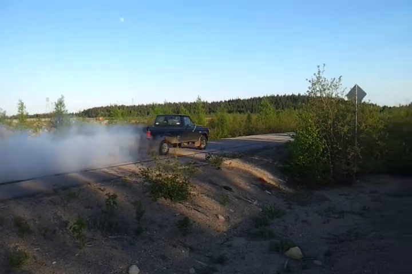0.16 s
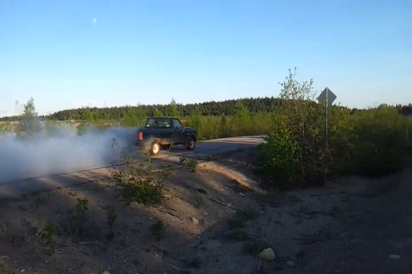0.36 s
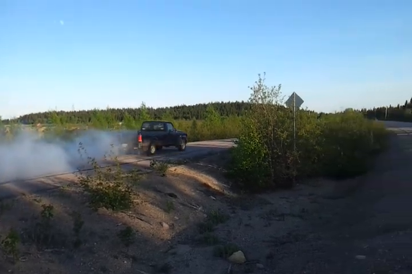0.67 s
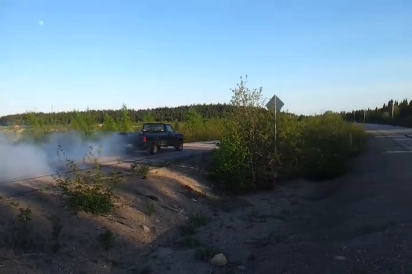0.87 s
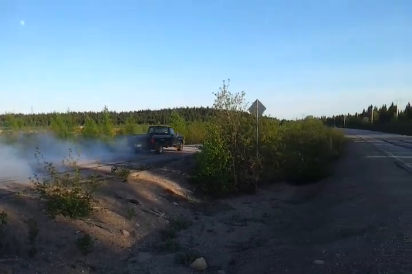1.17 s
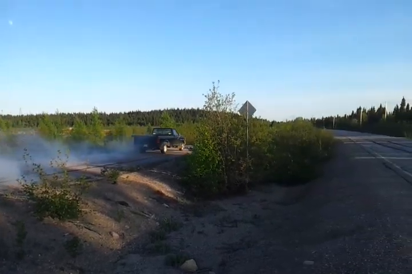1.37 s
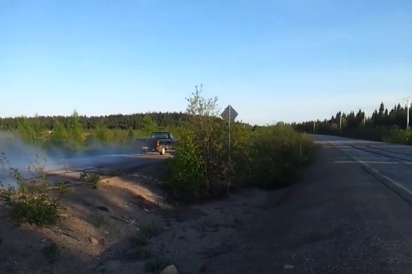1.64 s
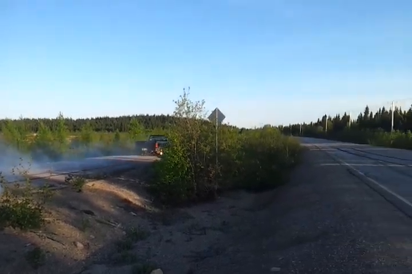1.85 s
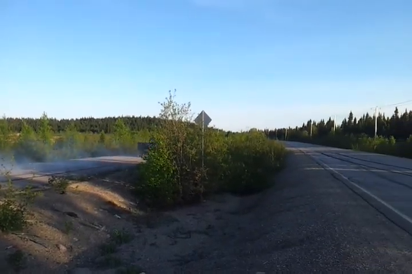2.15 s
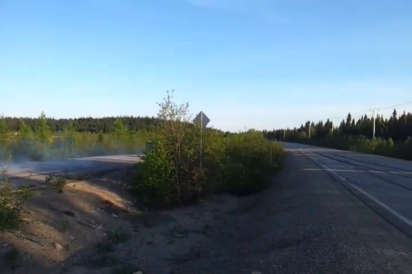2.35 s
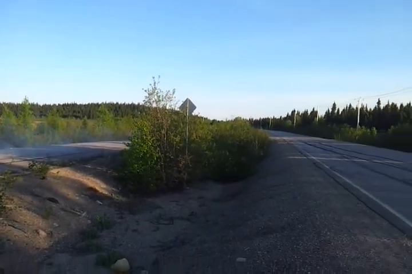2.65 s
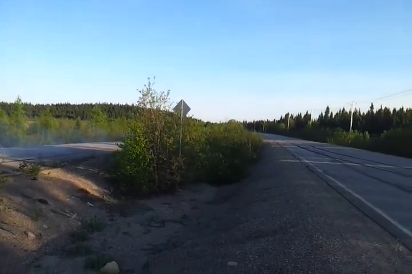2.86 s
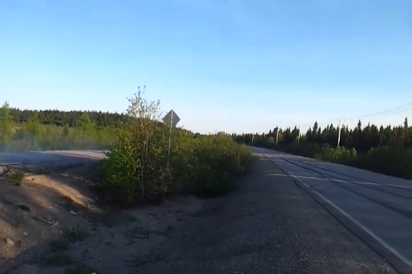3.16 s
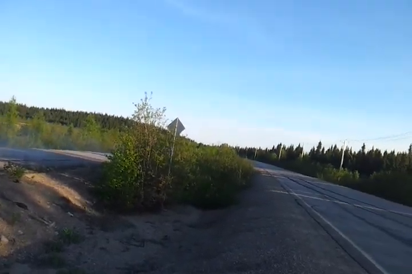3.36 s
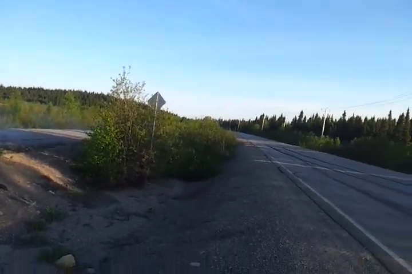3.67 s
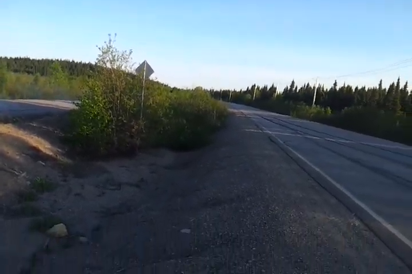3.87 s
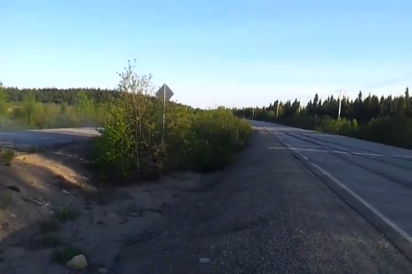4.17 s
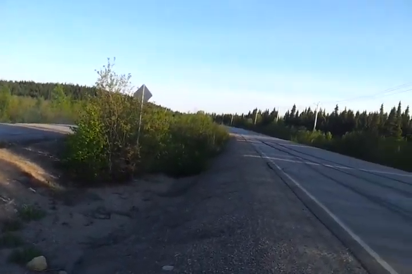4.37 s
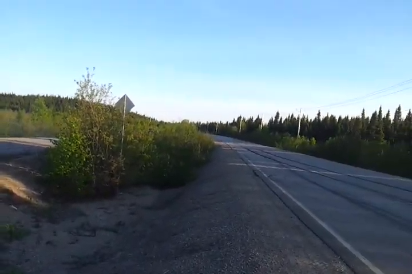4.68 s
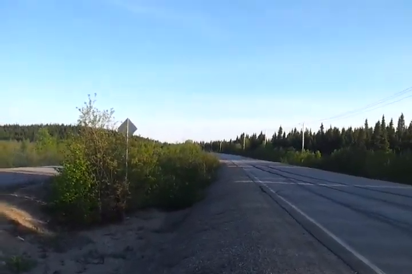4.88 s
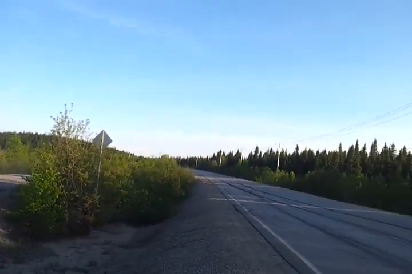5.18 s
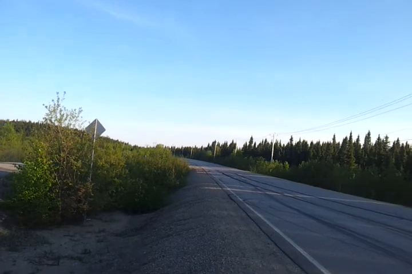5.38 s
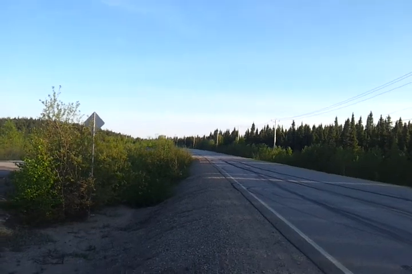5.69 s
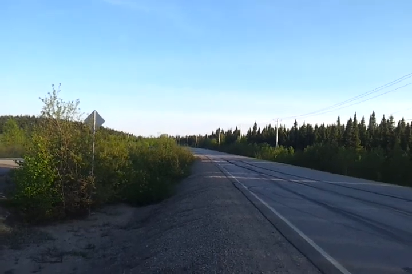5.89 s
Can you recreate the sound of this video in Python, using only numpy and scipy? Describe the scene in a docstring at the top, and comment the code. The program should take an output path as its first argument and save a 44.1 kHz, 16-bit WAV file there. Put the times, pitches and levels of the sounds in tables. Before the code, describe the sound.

Loud tyre scrub and throbbing exhaust drone of a truck burnout, dropping in pitch and receding, leaving faint bird chirps and gravel footsteps.

```python
"""A six-cylinder pickup does a burnout on a country road, then drives off behind bushes.
Its exhaust is low tones through a muffler plus raspy pulses ringing in a tailpipe; one cylinder runs weak.
Spinning tyres hiss as filtered noise that throbs with the engine, and tyre noise rushes up again at the end.
Nearby, bursts of noise and short thuds make feet shifting on the gravel shoulder; a far bird chirps."""
import sys
import numpy as np
from scipy import signal
from scipy.fft import rfft, irfft, next_fast_len
from scipy.io import wavfile
from scipy.ndimage import uniform_filter1d

SR = 44100
rng = np.random.default_rng(int(sys.argv[2]) if len(sys.argv) > 2 else 0)


def master(y):
    """Save y as 16-bit WAV."""
    cut = np.clip(np.atleast_2d(y).T, -1, 1)
    pcm = np.round(cut * 32767)  # scale
    wavfile.write(sys.argv[1], SR, pcm.astype(np.int16))


N = 266364
TIME = np.arange(N) / SR


def undb(db):
    """Turn decibels into a plain gain."""
    return 10 ** (np.asarray(db) / 20)


def unit(x):
    """Scale a sound to rms 1."""
    return x / np.sqrt(np.mean(x ** 2))


def noise():
    """White noise: an equal mix of all pitches."""
    return rng.standard_normal(N)


def curves(table):
    """Join the points of a table by straight lines; one value per sample for each column."""
    s, *columns = np.transpose(table)
    return [np.interp(TIME, s, c) for c in columns]


def walk(rate):
    """Slow chance with rms 1: random levels held 1 / rate seconds, then smoothed twice."""
    hold = int(SR / rate)
    held = np.repeat(rng.standard_normal(N // hold + 1), hold)
    smooth = uniform_filter1d(uniform_filter1d(held, hold), hold)
    return unit(smooth[:N])


def ramp(middle_s, length_s):
    """A straight rise from 0 to 1."""
    return np.clip((TIME - middle_s) / length_s + .5, 0, 1)


def burst(start_s, decay_s, rise_s):
    """Loudness curve of a blow: a quick rise, then an exponential fall."""
    age = np.maximum(TIME - start_s, 0)
    return (1 - np.exp(-age / rise_s)) * np.exp(-age / decay_s)


def resonate(x, hz, width_hz):
    """One resonance: passes the pitches near its centre, with gain 1 at the centre."""
    return signal.lfilter(*signal.iirpeak(hz, hz / width_hz, fs=SR), x)


def band(x, lo_hz, hi_hz):
    """Keep only the pitches between two limits."""
    return signal.sosfilt(signal.butter(4, [lo_hz, hi_hz], "band", fs=SR, output="sos"), x)


def dull(x, top_hz):
    """Remove the treble above a limit without delaying the sound."""
    return signal.sosfiltfilt(signal.butter(4, top_hz, fs=SR, output="sos"), x)


def shape(x, points):
    """Change the tone balance of a sound by (pitch_hz, gain_db) points."""
    hz, db = np.transpose(points)
    size = next_fast_len(N + SR // 2, real=True)
    bins_hz = np.maximum(np.arange(size // 2 + 1) * SR / size, 1)
    gain = undb(np.interp(np.log(bins_hz), np.log(hz), db))
    return irfft(rfft(x, size) * gain, size)[:N]


def grains(points, grain_db, rate):
    """Grainy noise: its level jitters fast by chance, then it is coloured and set to rms 1."""
    return unit(shape(noise() * undb(grain_db * walk(rate)), points))


def whistle(start_s, length_s, start_hz, end_hz, db, waver=.004):
    """One gliding, slightly wavering bird note that swells and fades."""
    progress = np.clip((TIME - start_s) / length_s, 0, 1)
    hz = (start_hz + (end_hz - start_hz) * progress) * (1 + waver * walk(260))
    return undb(db) * np.sin(np.pi * progress) * np.sin(2 * np.pi * np.cumsum(hz) / SR)


# The bird repeats one falling note evenly, then ends on a rising one.
SONG_S, NOTE_EVERY_S, NOTE_COUNT, LAST_NOTE_S = 3.757, .207, 5, 4.7
# Its notes: length_s, start_hz, end_hz, level_db
FALLING_NOTE, RISING_NOTE = (.05, 3560, 3150, -51), (.065, 3350, 4750, -51)


def bird():
    """A faint song from the bushes: each note is a pure tone that glides in pitch."""
    falling = sum(whistle(SONG_S + k * NOTE_EVERY_S, *FALLING_NOTE) for k in range(NOTE_COUNT))
    return falling + whistle(LAST_NOTE_S, *RISING_NOTE)


# Tone balance of loose gravel: pitch_hz, gain_db
GRAVEL_TONE = [(500, -23), (1200, 2.5), (2500, -0.5), (4000, 3.5), (5700, 4), (7000, -4)]


def gravel(grain_db, rate):
    """Steady noise of many small stones rubbing together."""
    return grains(GRAVEL_TONE, grain_db, rate)


# Feet shuffling over loose gravel: middle_s, half_length_s, level_db
FOOT_SHUFFLES = [(4.078, 0.092, -47.5), (4.403, 0.19, -47), (5.15, 0.11, -48), (5.525, 0.2, -39),
                 (5.776, 0.057, -40)]


def shuffles():
    """Many small stones shift under a sliding sole: gravel noise that swells and fades."""
    swells = sum(undb(db) * np.exp(-((TIME - s) / half_s) ** 2) for s, half_s, db in FOOT_SHUFFLES)
    return gravel(grain_db=4.5, rate=600) * swells


# Single stones crunching underfoot: start_s, level_db (before stones_db is added), decay_s
CRUNCHING_STONES = [(2.623, -42, .008), (3.004, -46, .008), (4.021, -45, .01), (4.076, -45, .012),
                    (4.206, -45, .008), (4.228, -44, .007), (5.076, -46, .02), (5.481, -36, .011),
                    (5.535, -34, .016), (5.575, -30, .004), (5.638, -37, .004), (5.652, -37, .004),
                    (5.661, -34.5, .004), (5.783, -35, .005), (5.812, -26, .005)]
# Shoes pressing into the shoulder: start_s, level_db (before scuff and knock gains), pitch_hz, decay_s of the scuff
SHOE_TREADS = [(3.01, -39, 297.5, 0.047), (4.068, -39, 347.6, 0.027), (4.833, -32, 694, 0.0053),
               (5.351, -32.5, 297, 0.036), (5.435, -25, 447, .01), (5.475, -31, 382, 0.031),
               (5.522, -28.5, 295, 0.04), (5.586, -22, 109, 0.018), (5.638, -28.5, 150.3, 0.012),
               (5.663, -27, 146, .02), (5.786, -33.5, 330, 0.02)]


def footsteps(stones_db=5, knock=1., scuff=0.89):
    """Soles knock (a short tone) and scuff (dull noise) on the shoulder; stones crunch under them."""
    crunches = sum(undb(db + stones_db) * burst(s, decay_s, rise_s=0.00086)
                   for s, db, decay_s in CRUNCHING_STONES)
    out = gravel(grain_db=3, rate=1500) * crunches
    for s, db, hz, decay_s in SHOE_TREADS:
        width_hz = 1.37 * hz
        soil = unit(resonate(resonate(noise(), hz, width_hz), hz, width_hz))
        thud = np.sin(2 * np.pi * hz * (TIME - s)) * burst(s, 1 / hz, rise_s=.001)
        out += undb(db) * (scuff * soil * burst(s, decay_s, rise_s=0.0051) - knock * thud)
    return out


def slips(points, grain_db):
    """Dense tiny slips of rubber on asphalt."""
    return grains(points, grain_db, rate=700)


def roar_and_hiss(x, flicker_db):
    """Split tyre noise at 2000 Hz into a roar and a hiss that flicker separately."""
    roar = dull(x, 2000)
    hiss = x - roar
    # each part is set to an even strength within its main band
    roar = roar / band(roar, 700, 1800).std()
    hiss = hiss / band(hiss, 2400, 7000).std()
    return np.array([roar * undb(flicker_db * walk(35)), hiss * undb(flicker_db / 2 * walk(35))])


# Tone balance of scrubbing tyres: pitch_hz, gain_db
SCRUB_TONE = [(100, -6.5), (400, -21.5), (720, -10), (1050, 3), (1450, 0), (1850, -12.5), (2300, -1.5),
              (3000, -10), (4200, -10), (5600, -18.5), (7000, -23.5)]
# Tyres biting and scrubbing, at the start and again far off:
# peak_s, rise_s, fall_s, squeal_gain (times), roar_db, hiss_db
TYRE_SCRUBS = [(.04, 0.06, .08, 1, -17, -28.5), (0.201, 0.045, 0.091, 1.2, -17, -32),
               (5.79, .07, .2, 0, -39.5, -41), (5.939, .025, .22, 0, -32.7, -42.5)]


def scrubs(squeal_hz=890, squeal_width_hz=130):
    """Rushes of tyre noise that swell and die away; a hard bite adds a hoarse squeal of the tread."""
    out = np.zeros(N)
    for peak_s, rise_s, fall_s, squeal, roar_db, hiss_db in TYRE_SCRUBS:
        swell = np.exp(-np.maximum((peak_s - TIME) / rise_s, (TIME - peak_s) / fall_s))
        tread = slips(SCRUB_TONE, grain_db=.8)
        tread = tread + squeal * resonate(tread, squeal_hz, squeal_width_hz)
        out += swell * (undb([roar_db, hiss_db]) @ roar_and_hiss(tread, flicker_db=1.6))
    return out


# Narrow peaks and hollows in the tyre noise: pitch_hz, width_hz,
# added_gain (times; half of it at the start, all of it from 2.2 s)
TYRE_RIPPLE = [(1470, 220, 0.98), (2020, 160, -.75), (2170, 310, 0.89), (2290, 110, -0.7)]


def road_echo(x, lag_s=0.00232, near=0.16, far=0.29):
    """A dull reflection off the road combs the sound, more as the truck draws away."""
    late = dull(np.interp(TIME - lag_s, TIME, x), 3000)
    distance = np.clip(TIME / 2.2, 0, 1) ** 2  # 0 near, 1 far
    x = x + (near + (far - near) * distance) * late
    for hz, width_hz, gain in TYRE_RIPPLE:
        x = x + gain * (1 + distance) / 2 * resonate(x, hz, width_hz)
    return x


# Tone balance of spinning tyres: pitch_hz, gain_db
SPIN_TONE = [(40, -22), (130, -7), (260, -7), (420, -3), (570, 0.5), (680, -4.5), (850, 0), (1100, -1.5),
             (1370, -1), (1680, -11), (1820, -5.5), (2900, -10.5), (4000, -7.5), (6500, -14.5)]
# Tone balance of rolling tyres: pitch_hz, gain_db
ROLL_TONE = [(30, -15), (70, 10.5), (180, 10), (300, -8), (550, -3.5), (680, -5), (1000, 1.5), (1400, -2),
             (1900, -10), (2600, -9), (3300, -6.5), (4300, -7.5), (6500, -17.5)]
# Overall tyre level as the truck draws away: time_s, level_db
TYRE_LEVEL = [(0, -13.5), (.35, -17), (.75, -18), (1.25, -22.5), (1.67, -23), (1.82, -28), (2.95, -41.5),
              (3.85, -47), (4.6, -48.5), (6.04, -51)]
# Each kind of tyre noise against that level: roar_db, hiss_db
SPIN_DB, ROLL_DB = (-1.03, -6), (1.5, -3.5)


def tyres(firings, change_middle_s=3.27, change_length_s=1.57):
    """The tyres spin in step with the engine's pulses, then roll away into the distance."""
    far = ramp(change_middle_s, change_length_s)
    throb = 1 + .17 * np.cos(np.pi * firings) + .06 * np.cos(np.pi * firings / 3)
    spin_noise = road_echo(slips(SPIN_TONE, grain_db=.9))
    spin = undb(SPIN_DB) @ roar_and_hiss(spin_noise, flicker_db=.6)
    roll = undb(ROLL_DB) @ roar_and_hiss(slips(ROLL_TONE, grain_db=1.5), flicker_db=1.5)
    mix = spin * throb * np.sqrt(1 - far) + roll * np.sqrt(far)
    return mix * undb(curves(TYRE_LEVEL)[0])


# Bushes weaken the rasp, and the overtones progressively over the octave above SHADE_FROM_HZ.
BUSHES_S, SHADE_TAKES_S, SHADE_DB, SHADE_FROM_HZ = 1.466, 1.2, 20, 194


def shade():
    """Loss in dB as the truck slips behind the bushes."""
    return SHADE_DB * np.clip((TIME - BUSHES_S) / SHADE_TAKES_S, 0, 1)


# Engine speed: held high, a last push, a fall as the throttle eases, then coasting: time_s, firing_rate_hz
ENGINE_SPEED = [(0, 203), (.35, 199.7), (.55, 196.5), (1.1, 195), (1.28, 196.8), (1.45, 206.6),
                (1.72, 216.6), (1.79, 203.2), (2.33, 157.7), (2.53, 122.5), (2.66, 118.1), (2.79, 128.6),
                (3.05, 122), (3.28, 124.8), (4.08, 118.6), (5, 98.94), (5.7, 79.3), (6.04, 76.1)]


def engine_speed():
    """Firings per second, wavering slightly by chance."""
    return curves(ENGINE_SPEED)[0] * (1 + .003 * walk(30) + .003 * walk(8))


# What the driver does: flat out, eased off, shut (engine braking), then pulling gently at low revs.
# Columns: time_s, change_s, firing_tone_db, fade_db_per_s, then four levels relative to the firing tone:
# one_cylinder_bank_db, bank_third_harmonic_db, twice_firing_db, rasp_db
THROTTLE_SETTINGS = [(0, .05, -13, 1.7, -5, -8.5, -11.5, -5.5),
                     (1.75, 0.093, -20, 3.8, 1.2, -11.5, -16.5, -5.5),
                     (2.535, .11, -24.5, 1.95, -5, -25, -30, -22),
                     (4.9, 0.33, -30, 3.5, -13, -9, -17.5, -24)]


def throttle():
    """Levels in dB of firing tone, three overtones and rasp; each setting replaces the last and fades."""
    levels = None
    for s, change_s, db, fade_db_per_s, *relative_db in THROTTLE_SETTINGS:
        offsets_db = np.array([0, *relative_db])[:, None]
        setting = db - fade_db_per_s * (TIME - s) + offsets_db
        levels = setting if levels is None else levels + (setting - levels) * ramp(s, change_s)
    return levels


def throttle_lift(at_s=1.752, length_s=0.008, depth=0.75):
    """The exhaust flow stalls for a moment as the driver eases off the throttle: a brief dip in level."""
    return 1 - depth * np.exp(-((TIME - at_s) / length_s) ** 2)


# Firing strength of the six cylinders, before small chance changes: level_db
CYLINDER_STRENGTH = [10.5, -13, 4.5, -0.5, 8, -3.5]
# Early (negative) or late arrival from each cylinder at the tailpipe, before chance jitter: delay_s
RUNNER_DELAY = [0, 0.0089, .00022, .00005, -.00008, .00012]
# Tailpipe resonances: pitch_hz, width_hz, gain_db
TAILPIPE = [(495, 33, 6.5), (544, 52, 3.5), (845, 54, 5.5), (1060, 98, -12), (1390, 86, -13.5)]


def rasp(firings):
    """Each firing sends a sharp pulse, a little different every time, into the tailpipe resonances."""
    at = np.flatnonzero(np.diff(np.floor(firings)))  # the sample of each firing
    size_chance, time_chance = rng.standard_normal((2, len(at)))
    sizes = undb(np.resize(CYLINDER_STRENGTH, len(at)) + 2 * size_chance)
    # the manifold's runners differ in length, so the cylinders' pulses arrive unevenly,
    # one of them, at high revs, more than a whole firing late
    late_s = np.resize(RUNNER_DELAY, len(at)) + .00009 * time_chance
    pulses = np.zeros(N)
    pulses[np.clip(at + (late_s * SR).astype(int), 0, N - 1)] = sizes
    ringing = sum(undb(db) * resonate(pulses, hz, width_hz) for hz, width_hz, db in TAILPIPE)
    pipe = band(ringing, 403, 1900)
    # power is evened out over a quarter second, so the throttle sets the level
    return pipe / np.sqrt(uniform_filter1d(pipe ** 2, SR // 4) + 1e-12)


# One cylinder runs weak off load: time_s, lost_share (0-1 of its stroke, before chance changes)
WEAK_CYLINDER = [(2.45, .07), (2.58, .5), (3.15, .92), (3.65, .8), (4.3, .5), (5.5, .3)]
# The muffler booms when an engine tone crosses its resonance: pitch_hz, gain_db
MUFFLER_GAIN = [(20, -17), (42, -12), (62, -10), (80, -0.5), (105, 0.5), (150, 0), (172, 5), (194, 6.5),
                (220, 3), (260, 0.5)]


def boom(firings, firing_hz, fire_db, overtones_db, gas_db=-29, flutter_db=0.62, flutter_db_per_multiple=.75):
    """The muffler passes the low engine tones and a rumble of gas; a weak cylinder drops one stroke in six."""
    angle = np.pi * firings  # turns at half the firing rate: the tone of one cylinder bank
    tone = -undb(fire_db + flutter_db * walk(25)) * np.cos(2 * angle)
    for multiple, db in zip((1, 3, 4), overtones_db):
        shaded = np.clip(np.log2(multiple * firing_hz / 2 / SHADE_FROM_HZ), 0, 1)
        level_db = db - shaded * shade() + flutter_db_per_multiple * multiple * walk(55)
        tone -= undb(level_db) * np.cos(multiple * (angle + np.pi / 4))
    weak_stroke = np.exp(-((firings % 6 - 2.93) / .55) ** 2)
    lost = np.clip(curves(WEAK_CYLINDER)[0] * (1 + .2 * walk(12)), 0, 1)
    gas = undb(fire_db + gas_db) * unit(band(noise(), 49, 220))
    return shape(tone * (1 - lost * weak_stroke) + gas, MUFFLER_GAIN)


def exhaust(firings, firing_hz):
    """The muffler's boom and the tailpipe's rasp follow the throttle together."""
    fire_db, *overtones_db, rasp_db = throttle()
    low = np.sqrt(2) * boom(firings, firing_hz, fire_db, overtones_db)
    sharp = rasp(firings) * undb(rasp_db - shade())
    return (low + sharp) * throttle_lift()


def scene():
    """The engine drives exhaust and tyres; the bird and the feet are added."""
    firing_hz = engine_speed()
    firings = np.cumsum(firing_hz) / SR  # running count of firings
    truck = exhaust(firings, firing_hz) + tyres(firings) + scrubs()
    return (truck + footsteps() + shuffles() + bird())[None]


MIC_HZ, TOP_HZ = 7000, 15800  # treble limits before and after clipping
ROUND_LEVEL, CEILING = .705, .725  # where peaks are rounded, then cut flat


def record(dry, notch_hz=4720, notch_width_hz=520, notch_depth=0.63):
    """A narrow-band microphone with one hollow in its treble; the loudest peaks are rounded, then clipped."""
    heard = dry - notch_depth * resonate(dry, notch_hz, notch_width_hz)
    heard = heard / (1 + (heard / ROUND_LEVEL) ** 16) ** (1 / 16)
    heard = signal.sosfilt(signal.butter(18, MIC_HZ, fs=SR, output="sos"), heard)
    heard = np.clip(heard, -CEILING, CEILING)
    return signal.sosfilt(signal.ellip(8, .2, 70, TOP_HZ, fs=SR, output="sos"), heard)


dry = scene()
out = record(dry)
master(out)
```